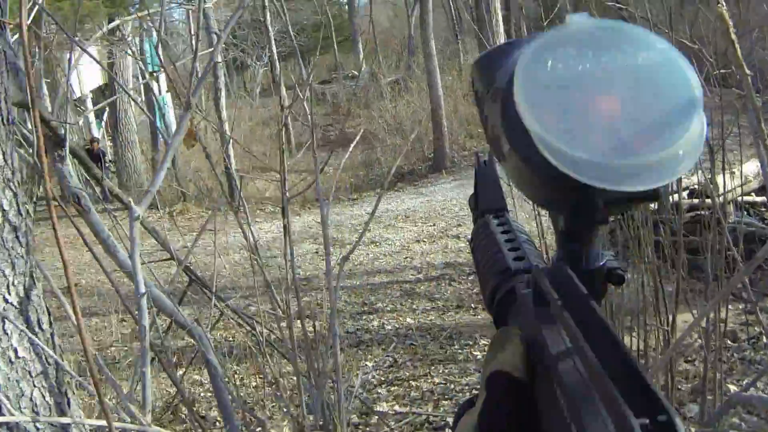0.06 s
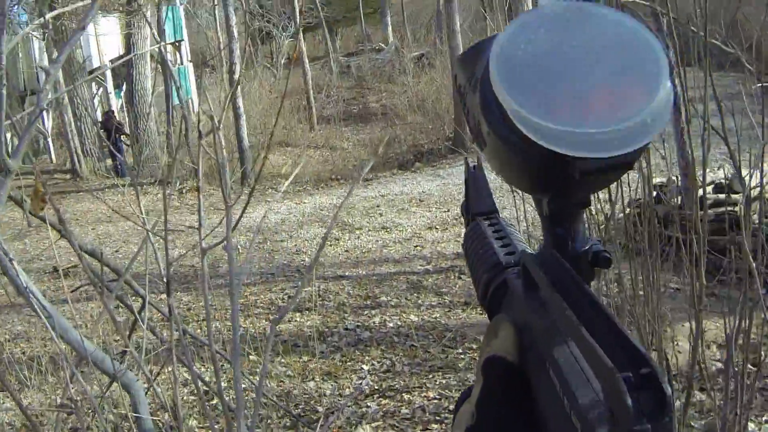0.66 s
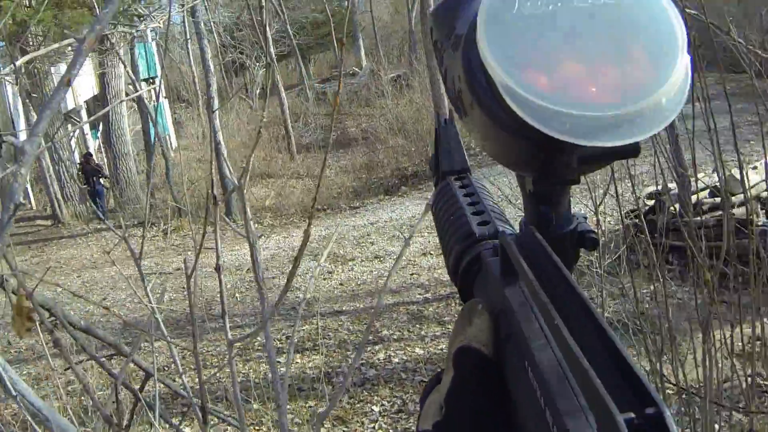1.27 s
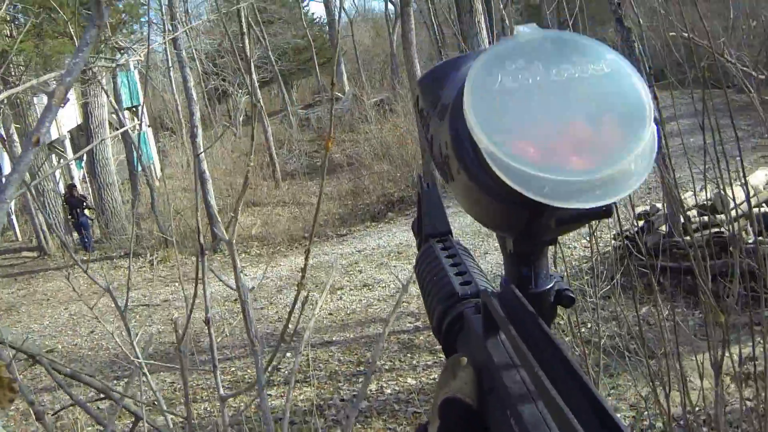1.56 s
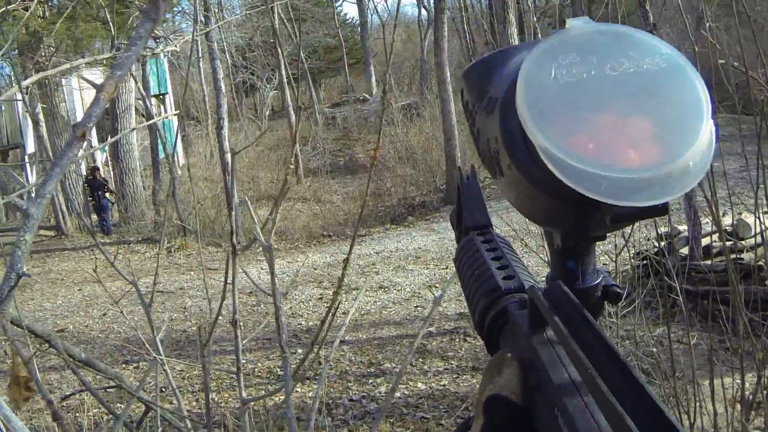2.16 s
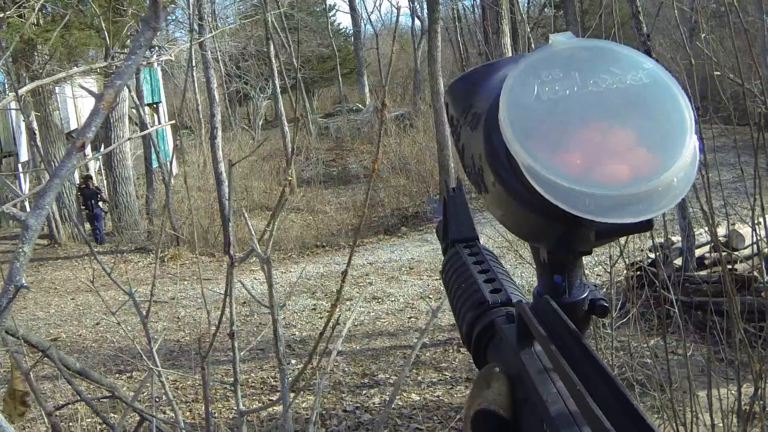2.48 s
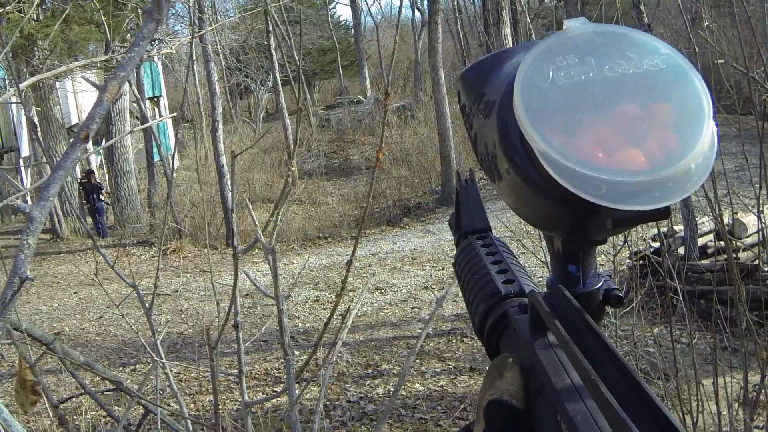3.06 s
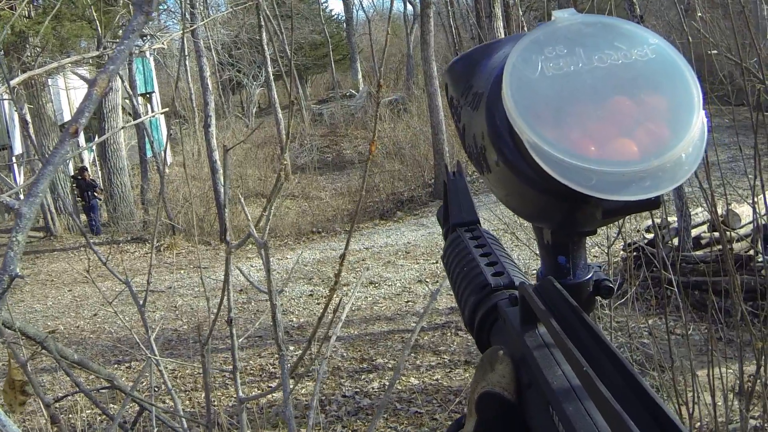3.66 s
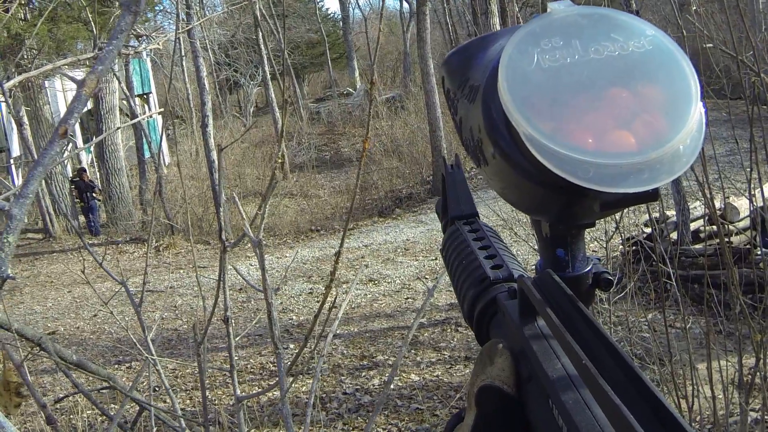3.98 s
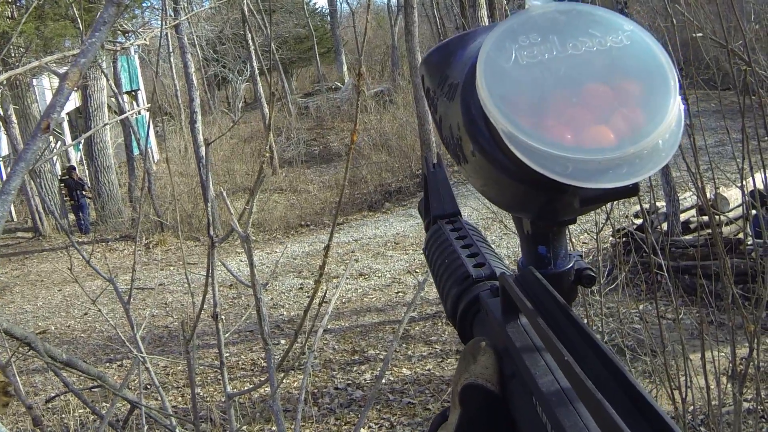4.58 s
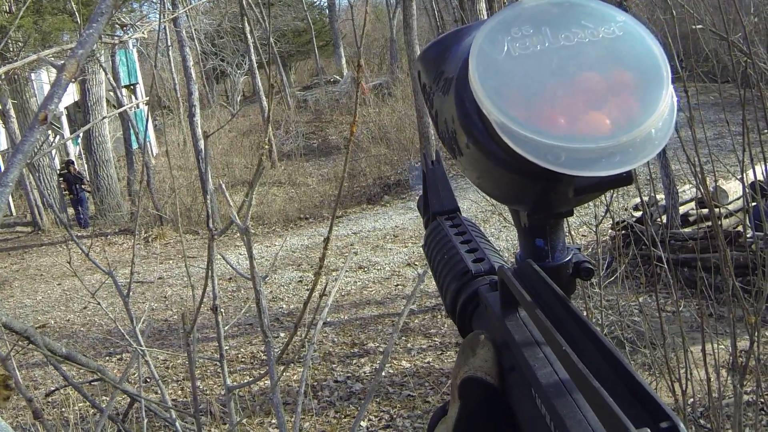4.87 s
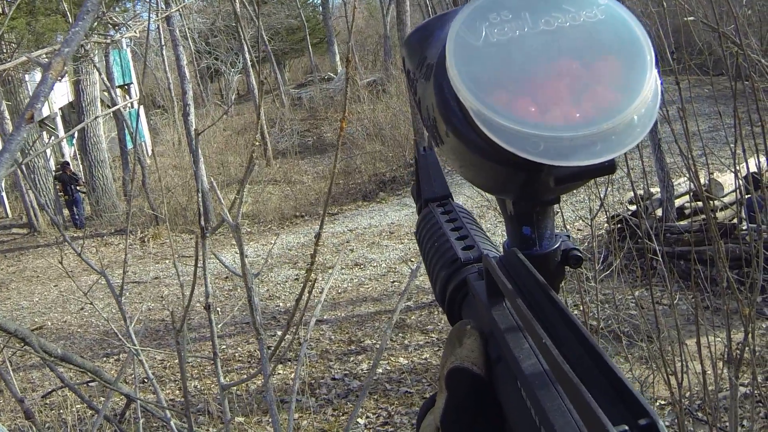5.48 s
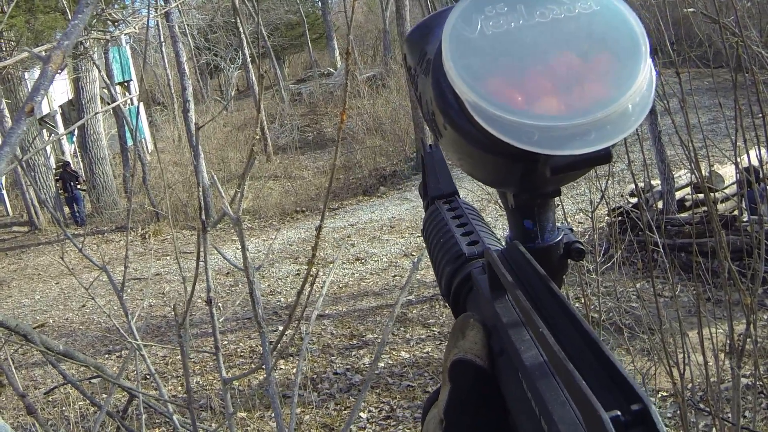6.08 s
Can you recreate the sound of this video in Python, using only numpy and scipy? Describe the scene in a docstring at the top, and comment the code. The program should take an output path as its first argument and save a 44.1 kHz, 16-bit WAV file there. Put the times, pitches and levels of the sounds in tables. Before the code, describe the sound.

A paintball marker fires in quiet woodland, very close to a body-worn microphone, over faint air. In the first 0.3 seconds, plastic gear creaks and squeaks as the marker is raised. From 0.4 to 1.4 seconds come six even shots, about five a second. Each is a sharp gas pop fused with a metallic click and clack, followed by a softer echo off the trees lasting about a second. A single shot lands at 1.9 seconds, then six quick ones from 2.3 to 3.2. Between 3.5 and 4.9 seconds the firing pauses: loose balls tick in the hopper, the gear knocks lightly and creaks faintly, and dry leaves crunch softly over a low handling rumble. A hard shot at 4.9 seconds breaks the lull, followed by a thinner one at 5.3 and three more at about 5.6, 6.0 and 6.2 seconds.

```python
"""A paintball marker fires eighteen shots in bare woodland, just in front of a body-worn camera.
Each shot: the hammer clicks, gas bursts from the barrel, the bolt slams back, the next ball drops.
Trunks scatter the shots into a tail. Plastic gear sticks and slips, creaking as the marker is raised.
Loose balls tick in the hopper; moves rumble on the camera and stir dry leaves, over faint air."""
import sys
import numpy as np
from scipy import signal
from scipy.fft import rfft, irfft, next_fast_len
from scipy.io import wavfile
from scipy.ndimage import uniform_filter1d, minimum_filter1d, map_coordinates

SR = 44100
rng = np.random.default_rng(int(sys.argv[2]) if len(sys.argv) > 2 else 0)


def waveform_to_disk(signal):
    """Save audio, clipped to [-1, 1], as 16-bit WAV at the path in sys.argv[1]."""
    frames = np.transpose(np.atleast_2d(signal))
    scaled = np.clip(frames, -1, 1) * 32767
    samples = np.round(scaled).astype(np.int16)
    wavfile.write(sys.argv[1], SR, samples)


N = 279592

# noise spectra: freq_hz, density_db
AIR_SPECTRUM = [(25, -24), (65, -48), (120, -31), (200, -16.5), (600, -16), (1400, -16.5), (1750, -19.5),
                (2200, -20), (2950, -28), (4000, -23.5), (4900, -34), (5800, -42), (15000, -58)]
RUMBLE_SPECTRUM = [(12, -31), (20, -7.5), (65, 4), (155, -6), (211, -31), (250, -12.5), (320, -26),
                   (550, -120)]
LEAF_SPECTRUM = [(100, -5), (230, -3.5), (400, -1), (800, -1), (1300, -3.5), (1650, -7), (1950, -4.5),
                 (2300, -6.5), (3000, -12.5), (4300, -9), (5900, -30.5), (8500, -37.5), (10500, -40),
                 (15000, -52)]
TICK_SPECTRUM = [(200, -4), (900, 0.5), (2200, -2), (3100, -7), (4400, -2), (6500, -19.5), (10000, -26),
                 (15000, -28)]
CLOTH_SPECTRUM = [(300, -7), (1500, 6.5), (4500, -1), (6000, -16.5), (10000, -19), (15000, -26)]
RUB_SPECTRUM = [(60, -40), (210, -22.5), (450, -13.5), (700, -3), (900, -6), (1060, -6.5), (1350, -1.5),
                (1650, -19.5), (2300, -20.5), (3200, -25.5), (4500, -24), (6000, -47.5), (15000, -76)]
HAMMER_SPECTRUM = [(100, -17), (400, -18), (750, -5.5), (1000, -2.5), (1600, -7.5), (2300, -4.5),
                   (3100, -11), (4000, 1), (5000, -1), (6500, -18.5), (8500, -17), (12000, -22.5),
                   (15500, -31.5)]
JET_SPECTRUM = [(200, -16), (800, 3), (1700, -0.5), (2700, -2.5), (3100, -9), (3900, -0.5), (5200, -10),
                (6300, -20), (8000, -22), (10500, -22.5), (12500, -32), (15500, -37)]
BOLT_SPECTRUM = [(60, -13), (160, -13), (700, -1.5), (1000, -3), (1400, -7.5), (2300, 0.5), (3150, -5),
                 (3900, 1.5), (5600, -7), (6500, -17), (8000, -15.5), (10500, -25), (15500, -31)]
# player raises the marker, later shifts stance: start_s, end_s, rumble_db, leaves_db
MOVES = [(0, 0.304, -46, -47), (4.097, 4.877, -51.5, -52)]
# dry leaves under shifting weight: start_s, level_db, t60_s
CRUNCHES = [(4.122, -39, 0.76), (4.279, -41, 0.96), (4.599, -35.5, 1.5)]
# loose balls in the hopper: start_s, level_db
HOPPER_TICKS = [(0.342, -31), (3.536, -37.5), (4.097, -37), (4.6, -29), (5.986, -32)]
# knocks on hopper and grip: start_s, level_db, pitch_hz
KNOCKS = [(0.041, -23, 2200), (0.06, -21.5, 2380), (1.786, -33.5, 844), (3.512, -35, 838),
          (3.877, -26.5, 135), (4.005, -38.5, 2450), (4.098, -37, 1750), (4.236, -29.5, 790),
          (4.281, -29, 790), (4.652, -25.5, 826), (4.831, -25.5, 2030), (5.125, -36, 700),
          (5.229, -34.5, 810), (5.83, -34, 786), (5.971, -33, 920)]
# strain on the plastic gear, hard on raising, light on shifting: time_s, strain_db
RAISING_STRAIN = [(0, -19.5), (0.1, -12), (0.17, -6.5), (0.213, -2), (0.235, -12), (0.29, -15), (0.36, -20)]
SHIFTING_STRAIN = [(4.45, -34), (4.56, -27.5), (4.75, -27), (4.91, -22)]
# hard slips of the gear: start_s, level_db, t60_s
JOLTS = [(0.1234, -5.5, 0.0069), (0.1491, -6, 0.0062), (0.1693, -15, 0.028), (0.1809, -5, 0.023),
         (0.2025, -11.5, 0.047), (0.212, -7, 0.029), (0.2237, -14, 0.032), (0.2515, -15, 0.014)]
# colour of the trunks' echo: freq_hz, gain_db
ECHO_SPECTRUM = [(60, -10), (200, -6), (500, -2.5), (1000, -4), (1500, -2), (2500, -2.5), (4200, 2),
                 (6000, -0.5), (10000, 9.5), (15000, 6)]
# decay of that echo: freq_hz, t60_s
ECHO_DECAY = [(100, 0.82), (600, 1.48), (2000, 1.34), (4500, 0.86), (8000, 0.53), (15000, 0.16)]
# ring of the receiver: pitch_hz, level_db
RECEIVER_MODES = [(950, -9), (1350, 2), (2120, 8), (2350, 10.5), (2640, 6.5), (3700, 10), (3960, -6),
                  (4230, -8), (4615, 8.5), (5230, 1), (5750, 0), (7950, -22), (10030, -26)]
# air column and body of the marker: centre_hz, width_hz, gain_db
BARREL_MODES = [(128.6, 80, 30.5), (374, 65, 31.5), (520.5, 59.5, 25.5), (679.2, 58, 34.5),
                (692.2, 136.3, 34.5), (946.4, 102, 28), (1074, 48, 21), (1213, 120, 31), (1647, 26, 16.5),
                (2004, 192, 24.5), (2480, 38, 5), (3800, 13, 21.5)]
# pressure surges, air ahead of the ball, then gas: delay_s, level_db, brightness_hz
SURGES = [(.00065, -12, 1800), (.00255, 1, 12360), (.00455, -13.5, 9000)]
# firing cycles: blast_s, pop_db, hammer_db, bolt_delay_s, bolt_db, clack_db
SHOTS = [(0.3815, -1, -4.5, 0.016, 0.5, 11), (0.5825, -2, -16.5, 0.014, 0, 4),
         (0.7795, -3, -18, 0.015, 0, -19), (0.984, -0.5, -16, 0.015, 1.5, -23),
         (1.1836, 0, -16, 0.015, 2, -1), (1.3926, 0, -15.5, 0.014, 2.5, -8),
         (1.9383, -1, -10, 0.015, 1.5, 1.5), (2.3119, -0.5, -13.5, 0.015, -1, -1),
         (2.5302, -1.5, -19, 0.015, -2, 5), (2.6864, -0.5, -19, 0.016, -1.5, 5.5),
         (2.864, -0.5, -18, 0.014, -0.5, -19), (3.0336, -1, -18.5, 0.015, -2, 7.5),
         (3.2388, -1, -18, 0.016, -1.5, -4), (4.9281, 0.5, -3.5, 0.014, 1.5, 10.5),
         (5.323, -8.5, -13, 0.018, -3, -6), (5.5773, 0, -18.5, 0.016, 2, -13),
         (6.0086, -0.5, -18, 0.016, -3.5, -6), (6.2465, -1, -18, 0.016, -3.5, 3)]


def amp(db):
    return 10 ** (np.asarray(db) / 20)


def unit_rms(x):
    return x / np.sqrt(np.mean(x ** 2) + 1e-20)


def log_interp(points, hz):
    """Table value at hz, on a log frequency axis."""
    freqs_hz, values = np.transpose(points)
    return np.interp(np.log(hz + 1), np.log(freqs_hz + 1), values)


def event_time_s():
    return np.arange(SR // 4) / SR


def wobble(rate_hz):
    """Smooth random curve, rate_hz knots a second."""
    knots = rng.standard_normal(int(N * rate_hz / SR) + 4)
    return map_coordinates(knots, [np.arange(N) * rate_hz / SR])


def filtered(x, response):
    """Apply a complex gain, response(hz)."""
    size = next_fast_len(len(x) + 8192)
    return irfft(rfft(x, size) * response(np.fft.rfftfreq(size, 1 / SR)), size)[:len(x)]


def noise(spectrum, samples=N):
    """Coloured noise, rms 1."""
    return unit_rms(filtered(rng.standard_normal(samples), lambda hz: amp(log_interp(spectrum, hz))))


def fade(t60_s, attack_s, delay_s=0):
    """Impact envelope: quick rise, exponential fall."""
    age_s = np.maximum(event_time_s() - delay_s, 0)
    return (1 - np.exp(-age_s / attack_s)) * amp(-60 * age_s / t60_s)


def burst(spectrum, envelope):
    return envelope * noise(spectrum, len(envelope))


def ring(pitch_hz, t60_s, attack_s):
    return np.sin(2 * np.pi * pitch_hz * event_time_s()) * fade(t60_s, attack_s)


def add(track, start_s, sound):
    part = track[max(round(start_s * SR), 0):][:len(sound)]
    part += sound[:len(part)]


def surroundings(air_db=-57, still_db=-62.5, rustle_db=-2.5, rise_s=0.29, fall_s=0.1):
    """Faint air; each move rumbles on the camera and stirs leaves, which snap and crunch under weight."""
    time_s = np.arange(N) / SR
    handling, stir = [np.full(N, amp(still_db))], []
    for start_s, end_s, rumble_db, leaves_db in MOVES:
        swell = np.exp(np.minimum(time_s - start_s, 0) / rise_s - np.maximum(time_s - end_s, 0) / fall_s)
        handling.append(amp(rumble_db) * swell)
        stir.append(amp(leaves_db) * swell)
    for start_s, level_db, t60_s in CRUNCHES:
        age_s = np.maximum(time_s - start_s, 0)
        attack = 1 - np.exp(-age_s / 0.0011)
        snap = amp(5 - 60 * age_s / 0.064)
        settle = amp(-60 * age_s / t60_s)
        stir.append(amp(level_db) * np.hypot(settle, snap) * attack)
    air = amp(air_db + 0.55 * wobble(2.81)) * noise(AIR_SPECTRUM)
    crackle = unit_rms(noise(LEAF_SPECTRUM) * amp(2.2 * wobble(300)))
    leaves = amp(rustle_db) * np.linalg.norm(stir, axis=0) * crackle
    sway = amp(1.5 * wobble(9))
    rumble = np.linalg.norm(handling, axis=0) * noise(RUMBLE_SPECTRUM) * sway
    return air + leaves + rumble


def ball_tick(level_db):
    """A ball taps on plastic."""
    return amp(level_db - 5) * burst(TICK_SPECTRUM, fade(0.036, 0.00037))


def rattles(knock_db=-2, scuff_db=-8):
    """Loose balls tick; hopper and grip take light knocks, the low ones with less scuff."""
    out = np.zeros(N)
    for start_s, level_db in HOPPER_TICKS:
        add(out, start_s, ball_tick(level_db))
    for start_s, level_db, pitch_hz in KNOCKS:
        hardness = min(pitch_hz / 800, 1)
        scuff = hardness * amp(scuff_db) * burst(LEAF_SPECTRUM, fade(0.11, 0.00063))
        add(out, start_s, amp(level_db + knock_db) * (ring(pitch_hz, 0.042, 0.0011) + scuff))
    return out


def slip(strain_db, t60_s, full_strain_hz=1120, hz_per_db=12.5, scrape_db=-10):
    """Plastic slips once: a scrape and an unsteady ring, higher under more strain."""
    time_s = event_time_s()
    pitch_hz = full_strain_hz + hz_per_db * strain_db
    wander = uniform_filter1d(uniform_filter1d(rng.standard_normal(len(time_s)), 21), 21)
    squeak = np.sin(2 * np.pi * pitch_hz * time_s + 0.032 * np.cumsum(wander)) * fade(t60_s, 0.00068)
    return 1.2 * squeak + amp(scrape_db) * burst(RUB_SPECTRUM, fade(0.015, 0.00039))


def creak(strain, rub_db=-23, rate_hz=70, slip_db=-12.5, scatter_db=4):
    """Strained plastic sticks and slips at an uneven rate, over a grainy rub."""
    times_s, strains_db = np.transpose(strain)
    envelope = amp(np.interp(np.arange(N) / SR, times_s, strains_db, left=-120, right=-120))
    out = amp(rub_db) * envelope * unit_rms(noise(RUB_SPECTRUM) * amp(2.6 * wobble(200)))
    for k, (late, louder) in enumerate(rng.standard_normal((56, 2))):
        start_s = times_s[0] + (k + 0.25 * late) / rate_hz
        if start_s < times_s[-1]:
            strain_db = np.interp(start_s, times_s, strains_db)
            gain = amp(slip_db + strain_db + scatter_db * louder)
            add(out, start_s, gain * slip(strain_db, t60_s=0.022))
    return out


def gear(cloth_db=-50):
    """Raising the marker brushes sleeves, creaks and jolts the gear; a later shift creaks faintly."""
    out = creak(RAISING_STRAIN) + creak(SHIFTING_STRAIN)
    times_s, strains_db = np.transpose(RAISING_STRAIN)
    raising = np.arange(N) / SR < times_s[-1]
    out += amp(cloth_db) * raising * noise(CLOTH_SPECTRUM)
    for start_s, level_db, t60_s in JOLTS:
        strain_db = np.interp(start_s, times_s, strains_db)
        add(out, start_s, amp(level_db) * slip(strain_db, t60_s))
    return out


def woodland_echo(shot, near_db=-25, far_db=-27, near_t60_s=0.15, lump_db=3):
    """Ground and twigs answer at once; trunks return a long, lumpy tail."""
    hz, time_s, spectra = signal.stft(rng.standard_normal(SR), SR, nperseg=256)
    lumps = amp(lump_db * rng.standard_normal(len(time_s)))
    decay = amp(-60 * time_s / log_interp(ECHO_DECAY, hz)[:, None])
    far = signal.istft(spectra * lumps * decay, SR, nperseg=256)[1][:SR]
    far *= 1 - np.exp(-np.arange(SR) / SR / 0.0041)
    tail = amp(far_db) * far / np.linalg.norm(far)
    near = rng.standard_normal(len(event_time_s())) * fade(near_t60_s, 0.0018, delay_s=0.002)
    add(tail, 0, amp(near_db) * near / np.linalg.norm(near))
    return signal.fftconvolve(shot, filtered(tail, lambda hz: amp(log_interp(ECHO_SPECTRUM, hz))))


def receiver(scatter_db=3, detune=0.008):
    """Hand-damped metal rings briefly, its modes varying from blow to blow."""
    offsets = rng.uniform(-1, 1, (len(RECEIVER_MODES), 2)) * [scatter_db, detune]
    return sum(amp(level_db + louder_db) * ring(pitch_hz * (1 + sharper), 0.042, 0.0008)
               for (pitch_hz, level_db), (louder_db, sharper) in zip(RECEIVER_MODES, offsets))


def hammer(ring_db=-24):
    """The sear lets go with a click; the hammer clicks again as it picks up the bolt."""
    release = 0.39 * fade(0.082, 0.001) + fade(0.011, 0.00037, delay_s=0.0013)
    pickup = 0.64 * fade(0.012, 0.0003, delay_s=0.00503)
    return burst(HAMMER_SPECTRUM, 0.42 * (release + pickup)) + amp(ring_db) * receiver()


def bolt(clack_db, slam_db=-5, bounce_db=-14, rattle_db=-33, ring_db=-33, clack_hz=2640):
    """Blowback slams the bolt against its stop; it bounces once, spring and receiver rattle on."""
    slam = amp(slam_db) * fade(0.0073, 0.00052)
    bounce = amp(bounce_db) * fade(0.018, 0.00095, delay_s=0.0019)
    rattle = amp(rattle_db) * fade(0.16, 0.0046)
    clack = amp(clack_db - 19) * ring(clack_hz * (1 + 0.026 * rng.normal()), 0.023, 0.0016)
    return burst(BOLT_SPECTRUM, slam + bounce + rattle) + clack + amp(ring_db) * receiver()


def blast(pop_db, jet_db=-13, pop_hz=1000, pop_width_oct=0.66, muzzle_cutoff_hz=4800):
    """Pressure surges ring the barrel; gas hisses out after the ball. Less pop, more hiss."""
    time_s = event_time_s()
    pressure = np.zeros(len(time_s))
    for delay_s, level_db, brightness_hz in SURGES:
        pulse = time_s * np.exp(-2 * np.pi * brightness_hz * time_s)
        start_s = delay_s + 0.00006 * rng.normal()
        add(pressure, start_s, amp(level_db + 0.6 * rng.normal()) * pulse / pulse.sum())
    modes = np.array(BARREL_MODES) + rng.standard_normal((len(BARREL_MODES), 3)) * [4, 0, 0.6]

    def barrel(hz):
        tube = 0
        for k, (centre_hz, width_hz, gain_db) in enumerate(modes):
            damping = 1j * hz * width_hz
            tube += (-1) ** k * amp(gain_db) * damping / (centre_hz ** 2 - hz ** 2 + damping)
        pop = amp(pop_db * np.exp(-(np.log2((hz + 1) / pop_hz) / pop_width_oct) ** 2))
        return tube * pop / (1 + (hz / muzzle_cutoff_hz) ** 6)

    outflow = fade(0.038, 0.00093, delay_s=0.0026) + 0.33 * fade(0.06, 0.00033)
    hiss = amp(jet_db - 0.59 * pop_db) * burst(JET_SPECTRUM, outflow)
    return filtered(pressure, barrel) + hiss


def marker(lock_time_s=0.018, feed_delay_s=0.081, feed_scatter_s=0.003, feed_db=-34.5):
    """Firing cycle: hammer, blast and bolt with their echo; then the next ball drops into the breech."""
    out = np.zeros(N)
    feed_jitters_s = feed_scatter_s * rng.standard_normal(len(SHOTS))
    for cycle, jitter_s in zip(SHOTS, feed_jitters_s):
        blast_s, pop_db, hammer_db, bolt_delay_s, bolt_db, clack_db = cycle
        blast_db = 1.43 + 0.12 * hammer_db  # a harder hammer opens the valve wider
        shot = amp(hammer_db) * hammer()
        add(shot, lock_time_s, amp(blast_db) * blast(pop_db))
        add(shot, lock_time_s + bolt_delay_s, amp(bolt_db) * bolt(clack_db))
        add(out, blast_s - lock_time_s, shot)
        add(out, blast_s - lock_time_s, woodland_echo(shot))
        add(out, blast_s + feed_delay_s + jitter_s, ball_tick(feed_db))
    return out


def scene():
    """Marker, gear and woodland, mono."""
    return (marker() + gear() + rattles() + surroundings())[None]


def record(dry, ceiling=1, window_samples=23, cutoff_hz=15450):
    """The camera's peak limiter, then a steep low-pass."""
    needed_gain = np.minimum(1, ceiling / (np.abs(dry[0]) + 1e-9))
    gain = uniform_filter1d(minimum_filter1d(needed_gain, window_samples), window_samples)
    return filtered(dry[0] * gain, lambda hz: 1 / (1 + (hz / cutoff_hz) ** 160))[None]


dry = scene()
out = record(dry)
waveform_to_disk(out)
```